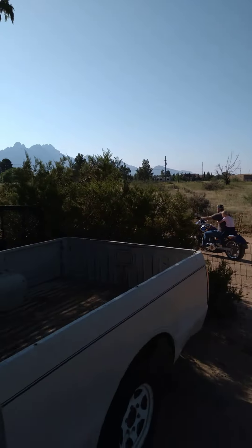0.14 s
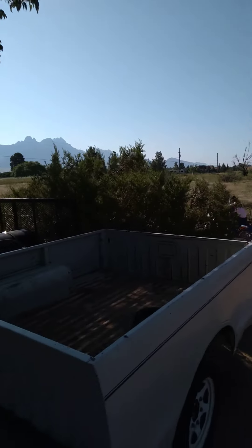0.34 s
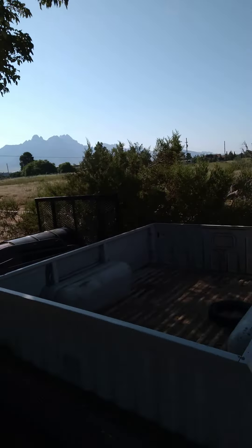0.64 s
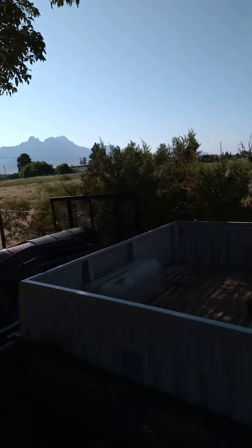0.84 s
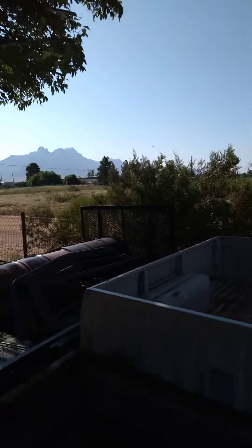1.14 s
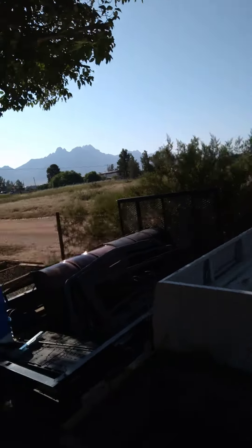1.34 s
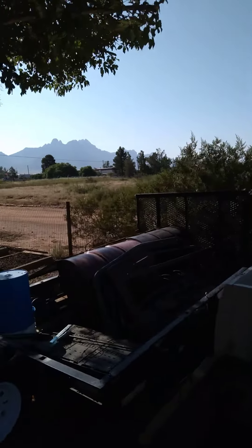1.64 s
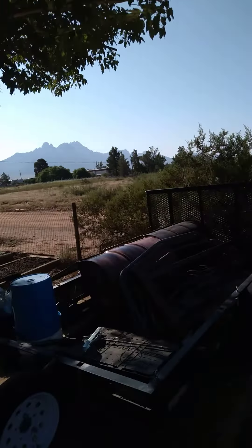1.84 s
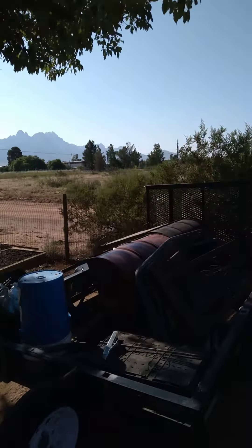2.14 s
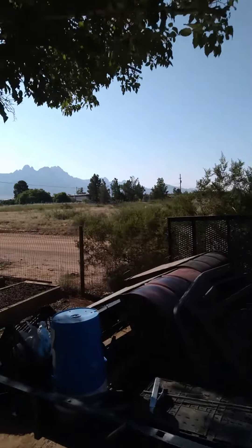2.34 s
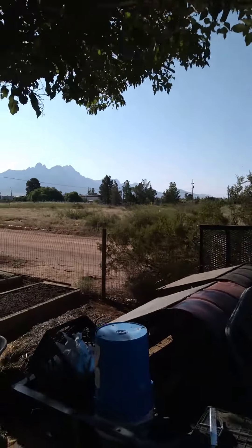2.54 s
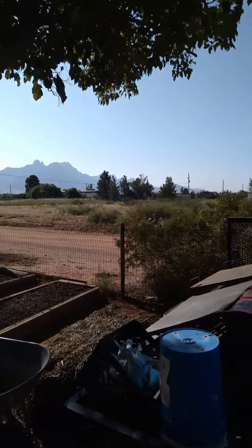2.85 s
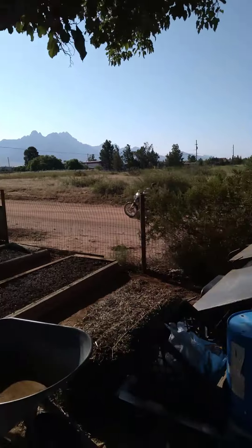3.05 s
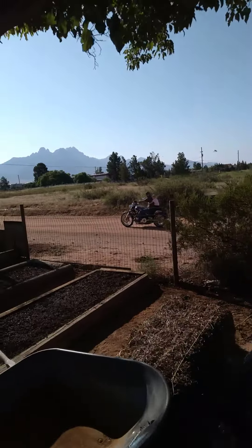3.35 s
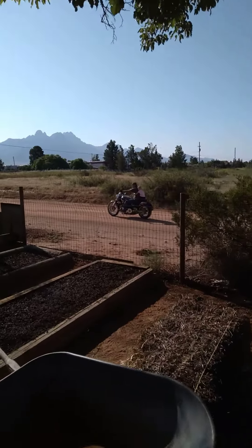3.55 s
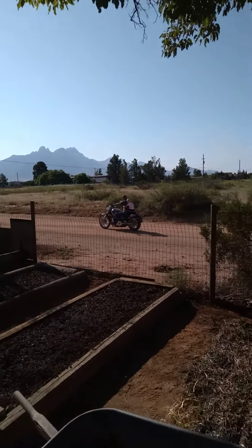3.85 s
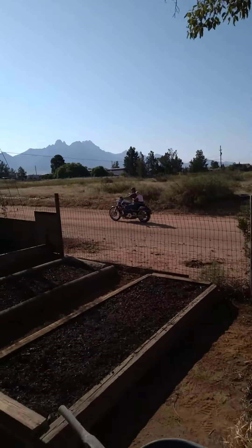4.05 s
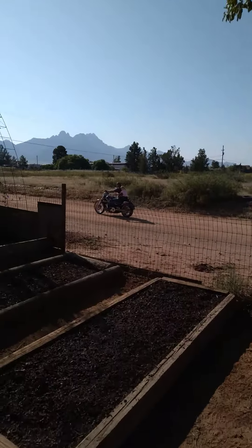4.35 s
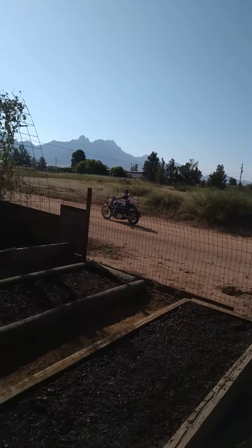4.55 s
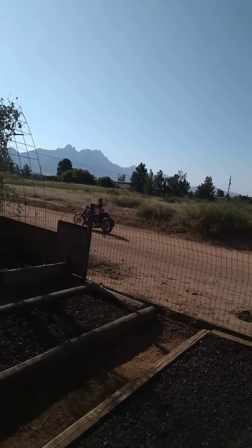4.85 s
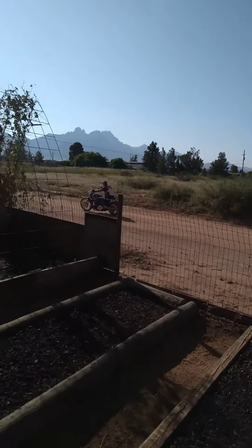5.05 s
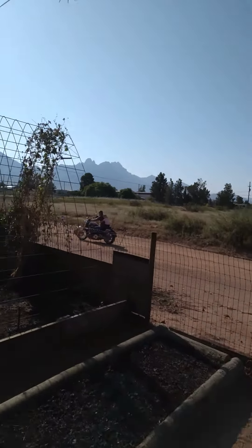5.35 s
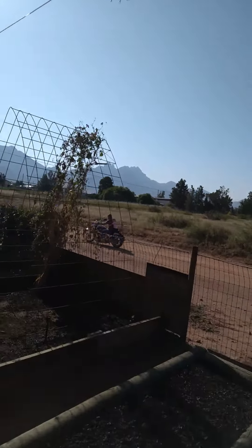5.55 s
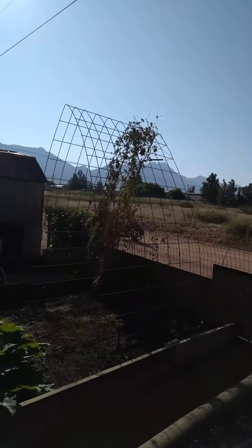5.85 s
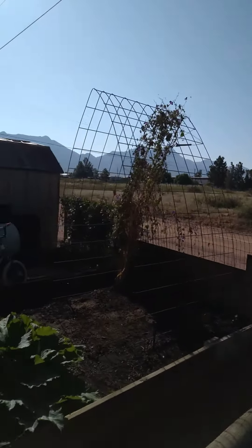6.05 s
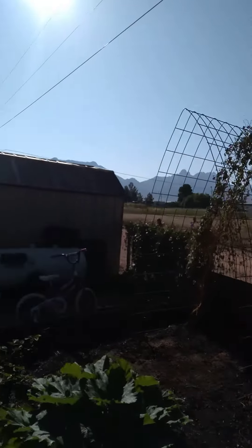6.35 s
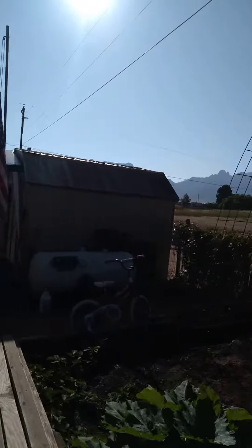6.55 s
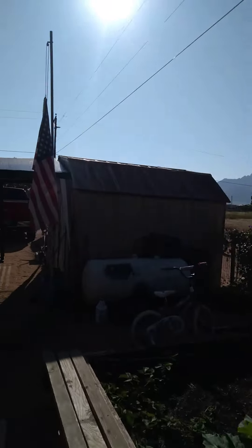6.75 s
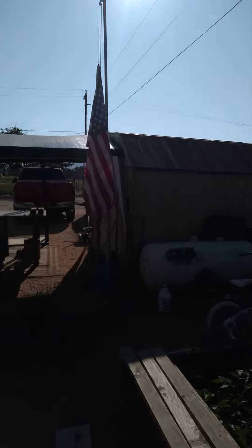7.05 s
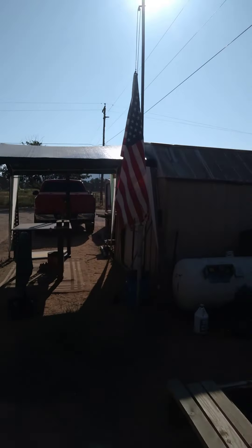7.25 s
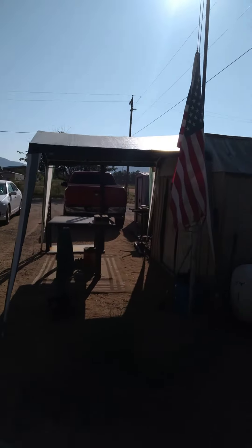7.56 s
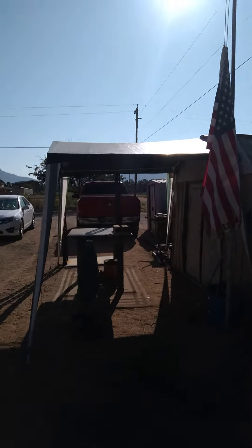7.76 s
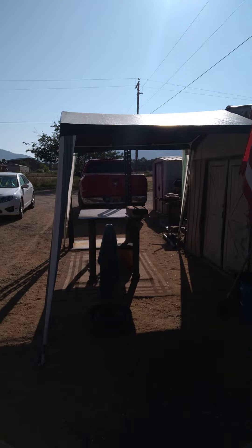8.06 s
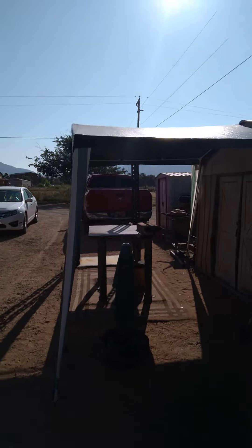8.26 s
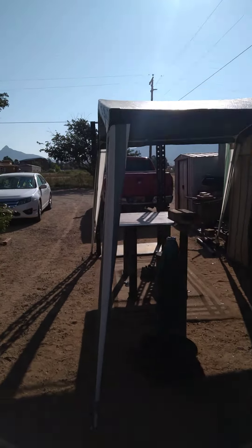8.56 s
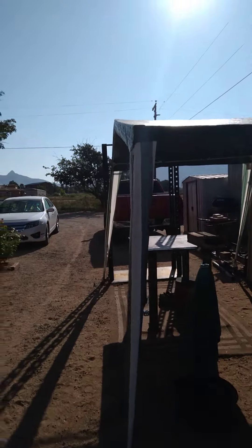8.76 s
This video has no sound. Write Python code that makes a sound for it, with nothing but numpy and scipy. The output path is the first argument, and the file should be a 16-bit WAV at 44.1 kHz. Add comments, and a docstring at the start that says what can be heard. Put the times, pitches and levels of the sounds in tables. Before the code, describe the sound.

Outdoors in still air, someone walks softly on gritty dirt near the microphone while a motorcycle approaches at low speed. Its lopsided, booming exhaust is loudest around the middle, with a metallic rasp, bright cracks and faint tyre hiss. The revs drop as it moves off, then climb again into separate putts. A distant bird gives a few thin, faint whistles in the last seconds.

```python
"""A motorcycle rides past a yard

A V-twin chugs slowly along a dirt road, eases off, then opens up and rides away. Its two cylinders fire at
uneven gaps; each firing starts with a sharp tick, booms in the pipes and barks off nearby walls. Tyres hiss on
the dirt, someone walks over grit close to the microphone, and a bird twitters far off."""
import sys
import numpy as np
from scipy import signal
from scipy.fft import rfft, irfft, next_fast_len
from scipy.io import wavfile
from scipy.ndimage import uniform_filter1d

SR = 44100
rng = np.random.default_rng(int(sys.argv[2]) if len(sys.argv) > 2 else 0)


def output_pcm(signal):
    """Save a mono or channel-first signal as 16-bit PCM at the path in sys.argv[1].

    Samples are clipped to [-1, 1] before scaling.
    """
    pcm = np.clip(np.atleast_2d(signal).T, -1, 1) * 32767
    wavfile.write(sys.argv[1], SR, np.round(pcm).astype(np.int16))


N = 392924
TIME = np.arange(N) / SR
FFT_SIZE = next_fast_len(N + SR // 10, real=True)
FREQS = np.maximum(np.arange(FFT_SIZE // 2 + 1) * SR / FFT_SIZE, 1)

# How fast the engine turns. Each row: time in seconds, turns per minute.
ENGINE_RPM = [(0.0, 869.8), (0.95, 884.8), (1.1, 948.6), (1.95, 1014.6), (2.35, 1123.7), (3.4, 1186.8),
              (3.85, 1191.3), (4.45, 1085.9), (4.95, 1113.3), (5.2, 1056.7), (5.5, 1063.4), (6.2, 1151.9),
              (6.4, 1044.3), (7.05, 1048.6), (7.15, 1109.7), (7.75, 1205), (8.4, 1410), (8.91, 1460)]
# Each row: place in the engine cycle from 0 to 1, boom delay in seconds, pulse and tick strength in dB.
CYLINDERS = [(0, -0.00206, 11.5, -6.5), (0.4363, -0.00595, 10.5, -4)]
# Echoes off walls and vehicles. Each row: delay in seconds, dB in the boom, dB in the bark and rasp.
ECHOES = [(0.0185, -2.5, -5.5), (.033, -5, -1)]
# The engine's hardest cracks. Each row: start in seconds, level in dB, ring pitch in Hz, ring level in dB.
CRACKS = [(0.068, -57, 7000, -60), (0.1473, -64, 6620, -39), (0.207, -57, 5600, -55),
          (2.609, -60, 5600, -40), (2.6537, -40, 5130, -39), (2.7146, -48, 5070, -36),
          (2.967, -35, 5380, -34), (3.0249, -45, 4800, -38), (3.127, -51, 5950, -41),
          (3.2753, -53, 4900, -34), (3.3345, -40, 5500, -34), (3.436, -37, 7000, -39),
          (3.4776, -35, 4660, -31.5), (3.5357, -42, 6100, -29), (3.5778, -36, 4670, -35),
          (3.636, -35, 4400, -36), (3.7387, -36, 6030, -33), (3.9388, -34, 7080, -41),
          (4.4075, -36, 4280, -43), (4.469, -38, 5680, -51), (4.5173, -37, 8290, -40),
          (4.63, -70, 4120, -40.5), (4.736, -41, 6860, -38), (4.7988, -51, 8400, -39),
          (4.8455, -50, 8500, -36), (4.9535, -55, 6900, -49), (6.4505, -61, 5400, -48),
          (6.495, -69, 4820, -42), (6.6094, -55, 7400, -52)]


def from_db(db):
    """Turn decibels into a number to multiply by."""
    return np.exp(np.asarray(db) * (np.log(10) / 20))


def in_time(rows):
    """Join rows of (seconds, value) into a value for every sample."""
    return np.interp(TIME, *np.transpose(rows))


def at_hz(rows):
    """Join rows of (Hz, value) into a value for every frequency."""
    hz, value = np.transpose(rows)
    return np.interp(np.log(FREQS), np.log(hz), value)


def steady(x):
    """Even out the level to about 1 over a few engine cycles; the fast throb stays."""
    power = np.mean(np.atleast_2d(x), axis=0) ** 2
    for _ in range(2):
        power = uniform_filter1d(power, size=9500)
    return x / np.sqrt(np.abs(power) + 1e-18)


def colour(pair, spectrum):
    """Make two unrelated signals into left and right, with a spectrum that falls steeply past its ends."""
    # Each row: frequency in Hz, how alike the two microphones hear it (1 means the same).
    likeness = [(100, .995), (300, .97), (650, .92), (1300, .78), (2800, .6), (5500, .3), (10000, -.1),
                (16000, .1)]
    roll_off = np.minimum(FREQS / spectrum[0][0], 1) * np.minimum(spectrum[-1][0] / FREQS, 1)
    gain = from_db(at_hz(spectrum)) * roll_off ** 6
    alike = np.clip(at_hz(likeness), -.9, 1)
    mid, side = rfft(pair, FFT_SIZE) * gain * np.sqrt([1 + alike, 1 - alike])
    return irfft(np.array([mid + side, mid - side]), FFT_SIZE)[:, :N]


def noise(spectrum):
    """Stereo noise with this spectrum, at a level of 1."""
    x = colour(rng.standard_normal((2, N)), spectrum)
    return x / x.mean(axis=0).std()


def clicks(times, sizes):
    """Clicks one sample long."""
    at = np.round(np.asarray(times) * SR).astype(int)
    inside = (at >= 0) & (at < N)
    return np.bincount(at[inside], np.asarray(sizes)[inside], N)


def fade(x, fade_s):
    """Give each click a tail that drops 60 dB in fade_s seconds."""
    return signal.lfilter([1], [1, -from_db(-60 / (fade_s * SR))], x + 1e-18)


def shifted(x, seconds):
    """Move a signal later (earlier if negative), wrapping round at the ends."""
    return np.roll(x, int(round(seconds * SR)))


def resonate(x, hz, width_hz):
    """A resonance: it lets through the sound near one pitch."""
    r = np.exp(-np.pi * width_hz / SR)
    feedback = [1, -2 * r * np.cos(2 * np.pi * hz / SR), r * r]
    return signal.lfilter(np.array([1, 0, -1]) * (1 - r * r) / 2, feedback, x)


def ringing(x, hz, width_hz):
    """A steeper resonance whose pitch may move, evened out in level."""
    turn = np.exp(2j * np.pi * np.cumsum(hz * np.ones(N)) / SR)
    r = np.exp(-1.5 * np.pi * width_hz / SR)
    return steady((signal.lfilter([1], [1, -2 * r, r * r], x * turn.conj()) * turn).real)


def phasing(x, strength, lag_s, wander=0.135, count=3):
    """Echoes off the ground and clutter shift as things move, cancelling some pitches and lifting others."""
    out = x.copy()
    knots_s = np.arange(0, 10, .3)
    for k in range(count):
        for side in range(2):
            drift = np.interp(TIME, knots_s, rng.standard_normal(len(knots_s)))
            lag = lag_s * (k + 1) * np.exp(wander * drift)
            out[side] += strength * np.interp(TIME - lag, TIME, x[side], left=0)
    return out / np.sqrt(1 + count * strength ** 2)


def air(level_db=-53):
    """Still outdoor air: a faint, low rush."""
    # Each row: frequency in Hz, relative level in dB.
    spectrum = [(20, -23), (50, 21), (200, 14), (1000, -8.5), (3000, -19.5), (10000, -15.5), (16000, -33)]
    return from_db(level_db) * noise(spectrum)


def bird():
    """Thin, softly swelling whistles that glide up or down, blurred by distance."""
    # Each row: start and length in seconds, level in dB, first and last pitch in Hz.
    twitters = [(6.776, 0.11, -64, 5600, 6060), (6.89, 0.1, -66.5, 5600, 5050),
                (7.12, 0.066, -70, 6100, 5600), (7.54, 0.084, -74, 5500, 5450),
                (8.048, 0.19, -77, 5550, 5450), (8.5, .09, -72, 5600, 5750)]
    swells, glides = 0, []
    for start, length, db, first_hz, last_hz in twitters:
        swells += from_db(db) * np.sin(np.pi * np.clip((TIME - start) / length, 0, 1))
        glides += [(start, first_hz), (start + length, last_hz)]
    return swells * ringing(rng.standard_normal(N), in_time(glides), width_hz=260)


def scuffs():
    """A bright sizzle swells and fades as a sole drags through fine grit."""
    # Each row: middle and half length in seconds, level in dB.
    drags = [(.17, 0.09, -80), (0.814, 0.036, -58), (2.37, 0.43, -63), (5.54, 0.35, -54),
             (7.82, 0.028, -64)]
    # Each row: frequency in Hz, relative level in dB.
    spectrum = [(3000, -3), (6500, 0.5), (8500, 9), (11000, 4.5), (16000, -8)]
    swells = sum(from_db(db) * np.exp(-((TIME - middle) / half) ** 2) for middle, half, db in drags)
    return swells * noise(spectrum)


def footsteps(grain_db=3):
    """Soles crush the dirt; now and then a piece of grit snaps."""
    # Each row: start in seconds, level in dB, seconds to fade by 60 dB.
    steps = [(0.72, -63, 0.98), (1.23, -56, 1), (1.763, -53.5, 0.37), (1.84, -54.5, 0.49),
             (2.114, -53, 0.14), (2.23, -49, 0.49), (2.338, -53, 1), (5.175, -59, 0.21), (5.734, -48, 0.21),
             (6.218, -52.5, 1), (7.234, -63, 0.68), (7.71, -66.5, 1), (8.17, -65.5, 1), (8.655, -60.5, 1)]
    # Each row: start in seconds, level in dB.
    grit_snaps = [(4.384, -39), (5.511, -40), (6.195, -27), (7.232, -57), (7.71, -57)]
    # Each row of both: frequency in Hz, relative level in dB.
    step_spectrum = [(300, -42), (1000, 2.5), (2500, 7.5), (5000, 1), (8000, 6.5), (11000, 2), (16000, -14)]
    snap_spectrum = [(700, -14), (1900, -4), (3200, 8), (4400, 5.5), (5700, -20), (7800, 6), (9300, 4),
                     (11000, 16), (16000, -13)]
    crush = np.zeros(N)
    for start, db, fade_s in steps:
        span = crush[int(start * SR):][:SR]
        age = TIME[:len(span)]
        span += from_db(db) * (from_db(-60 * age / fade_s) - from_db(-60 * age / 0.0018))
    grain = steady(uniform_filter1d(rng.standard_normal(N), size=90))
    snap_times, snap_db = np.transpose(grit_snaps)
    snaps = fade(clicks(snap_times, from_db(snap_db)), 0.013) * noise(snap_spectrum)
    return crush * from_db(grain_db * grain) * noise(step_spectrum) + snaps


def ride(closest_s=3.8, road_m=7.74, metres_per_s=5.5):
    """An even ride past: dB lost to distance, and facing (-1 nose-on, 0 side-on, 1 tail-on)."""
    along = metres_per_s * (TIME - closest_s)
    distance = np.hypot(along, road_m)
    return 20 * np.log10(distance / road_m), along / distance


DISTANCE_DB, FACING = ride()
FROM_BEHIND = np.maximum(FACING, 0)


def blocked_db():
    """Treble lost while the bike is behind bushes, a parked truck, fences or a shed."""
    # Each row: start and end in seconds, loss in dB, softness of the edges in seconds.
    obstacles = [(.33, 2.47, 8.5, 0.19), (.4, 2.4, 3, 0.1), (.42, 1.25, 12, 0.23), (4.03, 4.36, 2, 0.023),
                 (4.98, 9.5, 8, 0.068), (5.9, 9.5, 0, 0.055), (6.8, 9.5, 11.5, 0.2)]
    return sum(db * (np.tanh((TIME - start) / edge) - np.tanh((TIME - end) / edge)) / 2
               for start, end, db, edge in obstacles)


def aimed(x):
    """As the bike turns its tail to us, the lower treble thins and the very top grows."""
    top = irfft(rfft(x, FFT_SIZE) * at_hz([(6000, 0.024), (10000, 0.13)]), FFT_SIZE)[:, :N]
    return from_db(-3.5 * FACING) * (x - top) + from_db(17.5 * FACING) * top


def tyres(level_db=-54.5, grain_db=2):
    """Fine grit under the wheels makes a slightly grainy hiss."""
    # Each row: frequency in Hz, relative level in dB.
    spectrum = [(1290, -27), (2200, 3), (2640, -5.5), (2820, -2), (3420, -8.5), (3680, -5.5), (4270, -1),
                (4840, -9), (5960, -7.5), (7520, -1.5), (11100, -8), (15100, -41), (16000, -32)]
    grain = steady(uniform_filter1d(rng.standard_normal(N), size=60))
    loss_db = 1.01 * DISTANCE_DB + 0.69 * blocked_db()
    return from_db(level_db - loss_db + grain_db * grain) * noise(spectrum)


def revs(cruise_rpm=1110):
    """Engine speed, where 1 is cruising."""
    return in_time(ENGINE_RPM) / cruise_rpm


def cycles():
    """Engine cycles gone by; each takes two turns of the crank."""
    return np.cumsum(in_time(ENGINE_RPM)) / (120 * SR) - .08


def firings(place, jitter_s=0.0002):
    """The times at which one cylinder fires, once a cycle."""
    gone = cycles()
    times = np.interp(np.arange(int(gone[-1] - place) + 1) + place, gone, TIME)
    return times + rng.normal(0, jitter_s, len(times))


def throb(depth_db, place, sharpness):
    """The level dips at one place in every engine cycle; sharper dips are shorter."""
    return from_db(-depth_db * np.exp(sharpness * (np.cos(2 * np.pi * (cycles() - place)) - 1)))


def swing(share, place):
    """Each gush of hot gas lifts a resonance's pitch, which sags again before the next cycle."""
    return 1 + share * np.cos(2 * np.pi * (cycles() - place))


def clinks(fade_s=0.011, tail_db=-16.5, tail_s=0.15):
    """Each hard crack leaves a brief metallic ring at a pitch of its own."""
    out, age = np.zeros(N), TIME[:SR // 10]
    shape = from_db(-60 * age / fade_s) + from_db(tail_db - 60 * age / tail_s)
    for start, _, hz, db in CRACKS:
        out[int(start * SR):][:len(age)] += from_db(db) * shape * np.sin(2 * np.pi * hz * age)
    return out


def ticks(fired, gain_db=-34.5, uneven_db=1.7):
    """A bright spit with every firing, now and then a hard crack, and their scatter from the yard."""
    # Each row: frequency in Hz, relative level in dB.
    spectrum = [(900, -20), (2000, 10.5), (3200, 8.5), (5000, 2.5), (6500, 6), (8500, 9), (11000, 12.5),
                (16000, 0.5)]
    hits = sum(clicks(times, from_db(db + rng.normal(0, uneven_db, len(times))))
               for times, (_, _, _, db) in zip(fired, CYLINDERS))
    hits = shifted(hits * from_db(gain_db - DISTANCE_DB - blocked_db()), -0.00252)
    crack_times, crack_db, _, _ = np.transpose(CRACKS)
    cracks = clicks(crack_times, from_db(crack_db))
    direct = 2.1 * (fade(hits, .015) - fade(hits, .002)) + fade(cracks, .011)
    scatter = from_db(-8.5) * fade(hits, .22) + from_db(-22) * fade(cracks, .15)
    spit = noise(spectrum)
    metal = from_db(-7) * ringing(spit, hz=5500, width_hz=1400)
    return np.hypot(direct, scatter) * steady(spit + metal)


def pops(fired, cylinder_db=(-22, -20.5)):
    """With the pipe mouths in plain view, each firing arrives as one dry, blunt pop."""
    hits = sum(clicks(times, np.full(len(times), from_db(db))) for times, db in zip(fired, cylinder_db))
    hits = shifted(hits * from_db(-3 * DISTANCE_DB - blocked_db()), -0.00189)
    return -resonate(fade(hits, 0.0019), hz=330, width_hz=520)


def blast(trains, spectrum, fade_s, turbulence_db, tail_db):
    """Each pulse scatters the same way in its own pipe and drags a fresh puff of swirling gas along."""
    age = TIME[:SR // 8]
    shape = from_db(-60 * age / fade_s) + from_db(tail_db - 60 * age / 0.82)
    echoed = [train + sum(from_db(db) * shifted(train, s) for s, _, db in ECHOES) for train in trains]
    scattered = sum(signal.oaconvolve(x[None], shape * rng.standard_normal((2, len(age))), axes=1)[:, :N]
                    for x in echoed)
    puffs = np.sqrt(np.abs(signal.oaconvolve(sum(echoed) ** 2, shape ** 2)[:N]))
    turbulence = from_db(turbulence_db) * puffs * rng.standard_normal((2, N))
    return steady(colour(scattered + turbulence, spectrum))


def overtone(x, mode, bend):
    """One exhaust resonance: its pitch follows the bend, its strength the way the bike faces."""
    hz, width_hz, bend_power, db, behind_db = mode
    return from_db(db + behind_db * FROM_BEHIND) * ringing(x, hz * bend ** bend_power, width_hz)


def rasp(trains, chug, gain_db=-6, buried_db=14):
    """A metallic rasp with ringing overtones; it sounds hollow as the bike goes behind the fence."""
    # Each row: frequency in Hz, relative level in dB.
    spectrum = [(850, 3.5), (980, 0.5), (1150, -4.5), (1300, 2), (1550, -3), (1800, -2), (2200, -15),
                (2700, -11)]
    # Each row: pitch and width in Hz, how much it follows the bend, dB side-on, extra dB from behind.
    rings = [(1094, 77, 0.95, 0, 3), (1312, 170, 1, -10, -7), (1580, 44, 0.81, -17.5, -14),
             (1980, 130, 0.69, -14, 12)]
    # The heat of the gas bends the rings. Each row: time in seconds, pitch multiplier.
    heat_bend = [(0, 0.78), (1.3, 0.94), (2, 0.95), (2.4, 1.09), (3.1, 1.06), (3.8, 1.086), (4.3, 1.06),
                 (5.3, 0.96), (6.2, 1.09), (6.7, 1.06), (8.7, 1.16)]
    # Each row: pitch and width in Hz, relative level in dB.
    hollow_modes = [(760, 70, -5.5), (1118, 66, -1.5), (1377, 170, -4.5), (1570, 140, -5.5)]
    # Each row of both: time in seconds, level in dB.
    rasp_level = [(0.0, -55.5), (0.48, -61.5), (0.6, -68), (0.95, -69.5), (1.25, -57.5), (3.05, -41.5),
                  (4.5, -43), (5.5, -53.5), (6.1, -45.5), (6.55, -55.5), (7.05, -101), (7.25, -53),
                  (7.55, -81.5), (8.55, -64), (8.7, -54.5), (8.91, -70)]
    hollow_level = [(5.6, -73), (5.95, -54), (6.25, -49), (6.6, -51.5), (6.75, -62.5), (7.05, -80)]
    raw = blast(trains, spectrum, fade_s=0.058, turbulence_db=2, tail_db=-4)
    hollow = chug * sum(from_db(db) * ringing(raw, hz, width) for hz, width, db in hollow_modes)
    in_view = from_db(-np.maximum(blocked_db() - buried_db, 0))  # heavy blocking drowns the rings
    metal = in_view * sum(overtone(raw, mode, in_time(heat_bend)) for mode in rings)
    rasping = steady(chug * (raw + metal))
    return from_db(in_time(hollow_level)) * hollow + from_db(gain_db + in_time(rasp_level)) * rasping


def bark(trains, chug, gain_db=-2):
    """A throaty bark that honks and growls; the throat's pitch rises with the revs."""
    # Each row: frequency in Hz, relative level in dB.
    spectrum = [(205, -10.5), (250, 0), (330, -1.5), (410, -9.5), (530, -22.5), (630, -16), (800, -33),
                (950, -19)]
    # Each row: pitch and width in Hz, how much it follows the revs, dB side-on, extra dB from behind.
    growl_modes = [(565, 21, 0, -5, 2), (630.6, 60, 0.021, -4, -17), (744.5, 72, 0.12, -3, 1.5)]
    throat_mode = (327.5, 80, 0.88, -7.5, -3)  # one such row
    # Each row: time in seconds, pitch in Hz.
    honk_pitch = [(0, 465), (3.9, 477), (4.4, 450), (4.8, 470), (6.2, 465), (7.5, 438), (7.95, 450),
                  (8.07, 488), (8.2, 442), (8.7, 439)]
    # Each row of all three: time in seconds, level in dB.
    bark_level = [(0.0, -47.5), (0.85, -54.5), (1.05, -48), (2.15, -44.5), (2.45, -35), (4.3, -32.5),
                  (4.65, -48.5), (4.9, -41), (5.3, -54.5), (5.8, -54), (6.25, -34), (6.55, -59.5),
                  (7.05, -57), (7.4, -42), (7.7, -47.5), (7.9, -59.5), (8.75, -44.5), (8.91, -65)]
    honk_level = [(0.0, -65), (0.22, -61.5), (0.69, -81), (1.14, -69), (2.43, -56.5), (2.78, -46.5),
                  (3.55, -50.5), (3.57, -41), (3.97, -48), (4.91, -49), (5.58, -68.5), (6.03, -49),
                  (6.23, -48), (6.53, -79), (7.25, -77), (7.37, -53.5), (7.97, -65), (8.04, -44.5),
                  (8.21, -62), (8.66, -53), (8.69, -49), (8.91, -61)]
    growl_level = [(0.0, -63), (0.3, -66), (0.5, -57), (0.55, -84), (0.94, -86), (1.12, -57.5), (1.46, -81),
                   (2.21, -51), (3.2, -48.5), (3.92, -48), (5.01, -57.5), (5.06, -52), (5.56, -65),
                   (5.76, -59), (5.81, -66), (5.96, -50.5), (6.11, -56), (6.18, -47), (7.12, -82.5),
                   (7.27, -64.5), (8.14, -75.5), (8.66, -53), (8.91, -61)]
    raw = chug * blast(trains, spectrum, fade_s=.06, turbulence_db=-7, tail_db=-8)
    throat = overtone(raw, throat_mode, revs() * swing(.12, place=.4))
    throat *= from_db(1.6 * DISTANCE_DB)  # far off, the throat outlasts the broad bark
    gaps = throb(depth_db=8, place=.18, sharpness=5) * throb(depth_db=6, place=.88, sharpness=8)
    throaty = from_db(gain_db + in_time(bark_level)) * steady(gaps * (raw + throat))
    surge = raw * throb(depth_db=5, place=.08, sharpness=2)
    honk_hz = in_time(honk_pitch) * swing(.04, place=.45)
    honk = from_db(in_time(honk_level)) * ringing(surge, honk_hz, width_hz=42)
    growl = from_db(in_time(growl_level)) * sum(overtone(surge, mode, revs()) for mode in growl_modes)
    return throaty + honk + growl


def pipe(pulses, modes):
    """Pipe and muffler resonate one after the other, so each boom swells before it dies."""
    echoed = pulses + sum(from_db(db) * shifted(pulses, s) for s, db, _ in ECHOES)
    return steady(sum(from_db(db) * resonate(resonate(echoed, hz, width), hz, width)
                      for hz, width, db in modes))


def thumps(trains, gain_db=-5, lags_s=(-0.01201, 0.0031)):
    """A higher pipe thump for each cylinder; with more revs the first ends sooner and the second grows."""
    # Each row: pitch and width in Hz, relative level in dB.
    modes = [(148.4, 35.4, -7), (160.6, 38, -20.5)]
    # Each row: time in seconds, level in dB.
    level = [(0.0, -39.5), (0.75, -40.5), (1.15, -27), (2.2, -40.5), (2.75, -25), (3.4, -36.5),
             (3.85, -29.5), (4.55, -33), (4.6, -39.5), (6.3, -37), (6.35, -44), (7.35, -39.5), (7.65, -38),
             (8.3, -42), (8.75, -27.5), (8.91, -52)]
    pulses = sum(shifted(train, lag) for train, lag in zip(trains, lags_s))
    between = throb(depth_db=11, place=np.interp(revs(), [1, 1.06], [.56, .38]), sharpness=9)
    weak_beat = throb(depth_db=np.interp(revs(), [.8, 1, 1.06], [11, 5, 0]), place=.68, sharpness=2.5)
    after = throb(depth_db=9, place=.83, sharpness=9)
    return from_db(gain_db + in_time(level)) * steady(between * weak_beat * after * pipe(pulses, modes))


def boom(trains, gain_db=-2, low_cut_hz=49.3):
    """The lowest pipe resonances, which pause once a cycle."""
    # Each row: pitch and width in Hz, relative level in dB.
    modes = [(71.4, 9.2, 26), (92.6, 23.2, 35.5), (108.4, 1.8, 7)]
    # Each row: time in seconds, level in dB.
    level = [(0.0, -33.5), (0.5, -30.5), (0.7, -36.5), (1.15, -30), (1.95, -37), (2.45, -27.5), (2.8, -27),
             (4.7, -35), (5.0, -32), (5.3, -34), (6.2, -31), (6.45, -41), (7.05, -42.5), (7.6, -25),
             (8.0, -24.5), (8.45, -33), (8.7, -28), (8.91, -34)]
    pulses = sum(shifted(train, lag) for train, (_, lag, _, _) in zip(trains, CYLINDERS))
    pulses = signal.sosfilt(signal.butter(6, low_cut_hz, "high", fs=SR, output="sos"), pulses)
    # A little above cruising speed, and most from behind, the first beat sinks and one is left.
    limp_db = 5.5 * np.interp(revs(), [.85, 1.15, 1.23, 1.28], [0, 1, 1, 0]) * (1 + FACING)
    limp = throb(limp_db, place=.25, sharpness=1.5)
    pause_db = np.interp(revs(), [.85, 1], [7, 3])
    pause = throb(pause_db, place=np.interp(revs(), [.85, 1], [1.05, 1.15]), sharpness=8)
    pause *= throb(depth_db=3.5, place=.95, sharpness=4)
    return from_db(gain_db + in_time(level)) * steady(limp * pause * pipe(pulses, modes))


def exhaust(fired, muffler_hz=217.5, thin_below_hz=83.4):
    """Uneven pulses of gas drive the pipes; under hard throttle the sound breaks into separate putts."""
    trains = [clicks(times, from_db(db + rng.normal(0, 1.0, len(times))))  # a pulse train per cylinder
              for times, (_, _, db, _) in zip(fired, CYLINDERS)]
    muffler = signal.butter(4, [45, muffler_hz], "band", fs=SR, output="sos")
    bass = signal.sosfiltfilt(muffler, boom(trains) + thumps(trains))
    rough = [train * from_db(1.5 * rng.standard_normal(N)) for train in trains]  # some firings bark harder
    chug = throb(depth_db=np.interp(revs(), [.8, .9], [12, 4]), place=.87, sharpness=2.5)
    pipes = bass + bark(rough, chug) + rasp(rough, chug)
    throttle = np.interp(revs(), [1.1, 1.25], [0, 1])
    putts = throb(depth_db=9 * throttle, place=.86, sharpness=2) * pipes
    # From behind, hard throttle thins the deepest bass.
    deep = signal.sosfiltfilt(signal.butter(4, thin_below_hz, fs=SR, output="sos"), putts)
    thinning = np.interp(revs(), [1, 1.07], [0, .75]) * FROM_BEHIND
    return putts - thinning * deep + pops(fired)


def scene():
    """Motorcycle, walker, bird and still outdoor air."""
    # The exhaust drifts sideways as the listener turns. Each row: time in seconds, left minus right in dB.
    drift = [(0, -.5), (1.7, 0.34), (4.2, 0.33), (6.7, -0.1), (7.7, 1.8), (8.9, 0.5)]
    fired = [firings(place) for place, *_ in CYLINDERS]
    treble = aimed(ticks(fired) + tyres()) + footsteps() + scuffs()
    treble = phasing(treble, strength=0.55, lag_s=.0006)
    pan = from_db(in_time(drift) * np.array([[1], [-1]]) / 2)
    return pan * exhaust(fired) + treble + clinks() + bird() + air()


def record(dry, cutoff_hz=16200):
    """The two microphone openings each colour the sound their own way; the very top is cut off."""
    # Each row: frequency in Hz, left minus right in dB.
    balance = [(60, -0.5), (110, 0), (200, 0.5), (380, -2), (700, 0), (1290, 1), (2380, 3), (4400, 5.5),
               (7000, 9.5), (9800, -4.5), (15000, 4)]
    gains = from_db(at_hz(balance) * np.array([[1], [-1]]) / 2)
    gains /= np.sqrt(np.mean(gains ** 2, axis=0))
    heard = irfft(rfft(dry, FFT_SIZE) * gains, FFT_SIZE)[:, :N]
    return signal.sosfiltfilt(signal.ellip(10, .1, 60, cutoff_hz, fs=SR, output="sos"), heard)


dry = scene()
out = record(dry)
output_pcm(out)
```